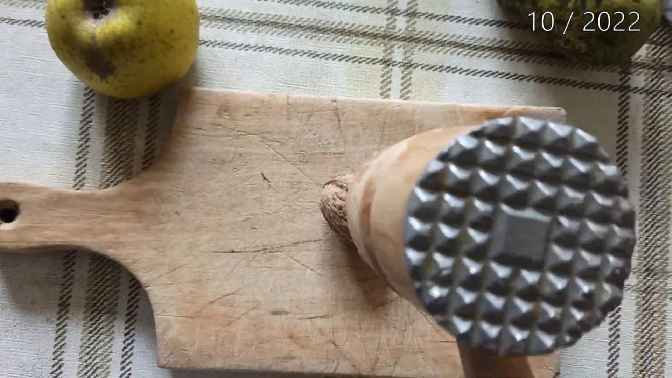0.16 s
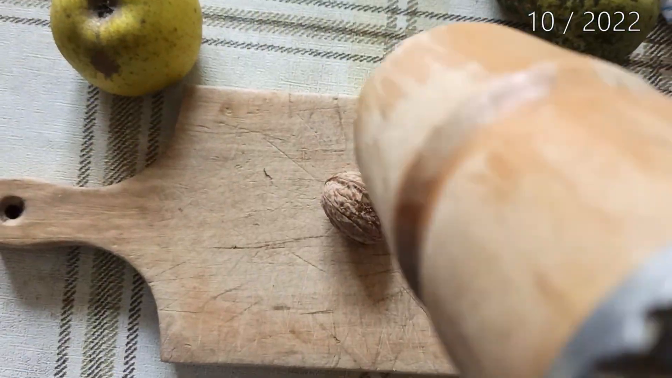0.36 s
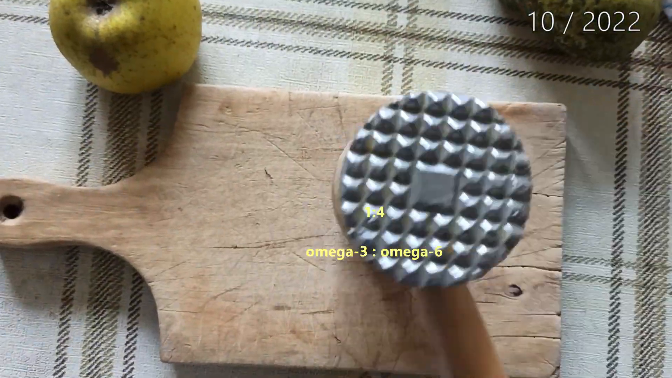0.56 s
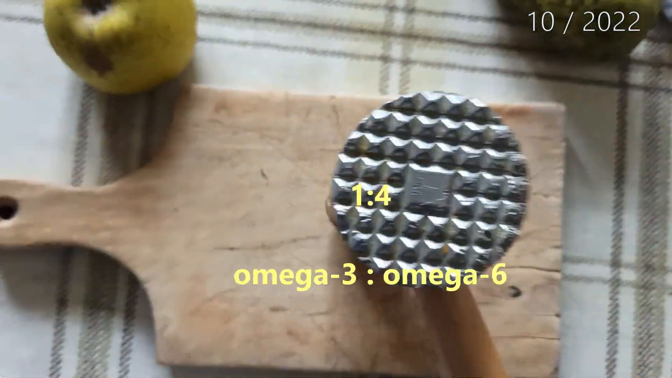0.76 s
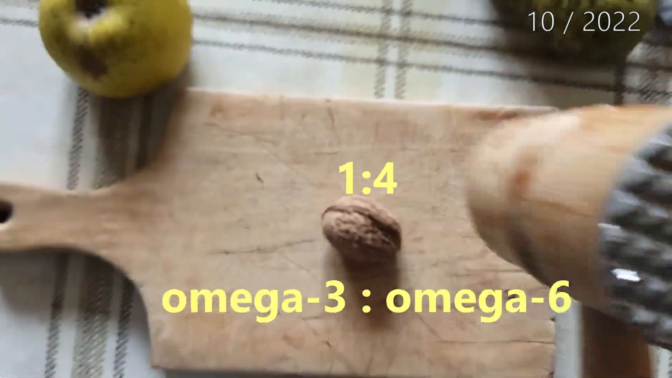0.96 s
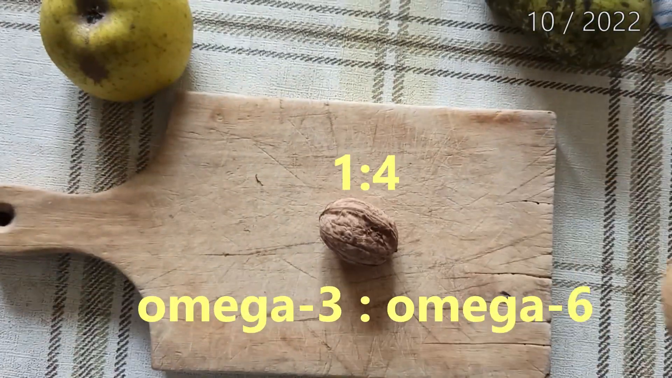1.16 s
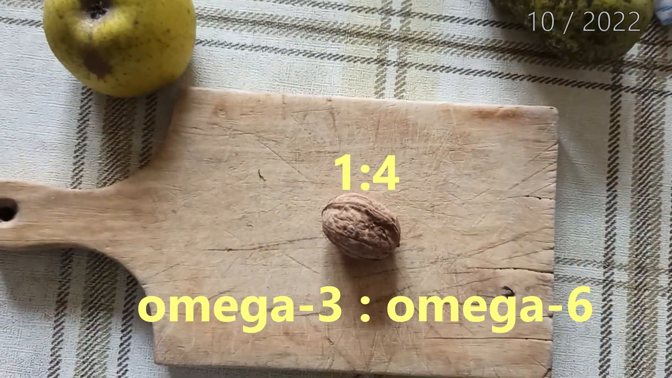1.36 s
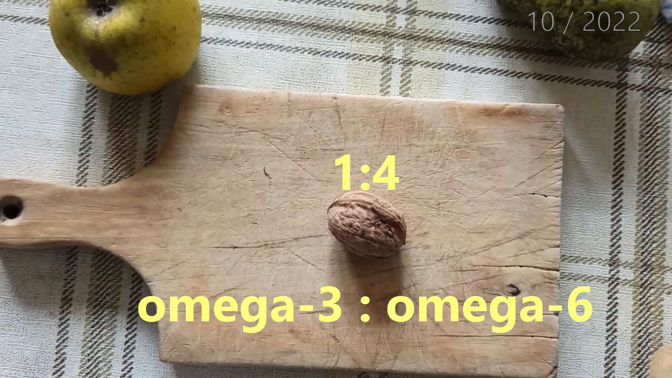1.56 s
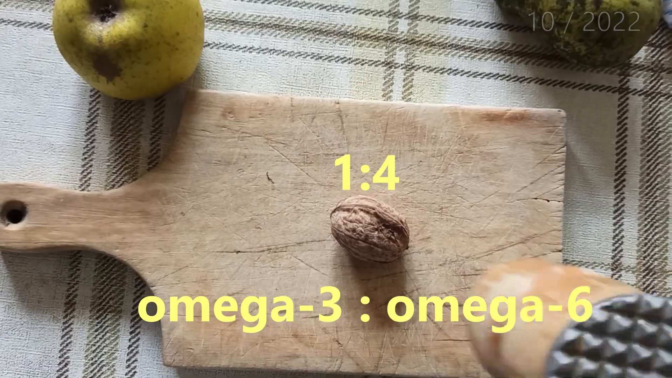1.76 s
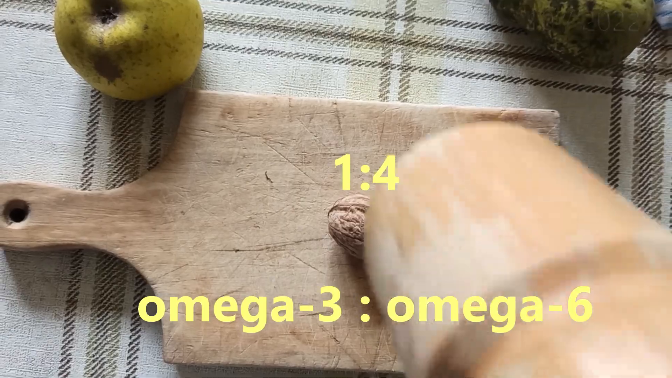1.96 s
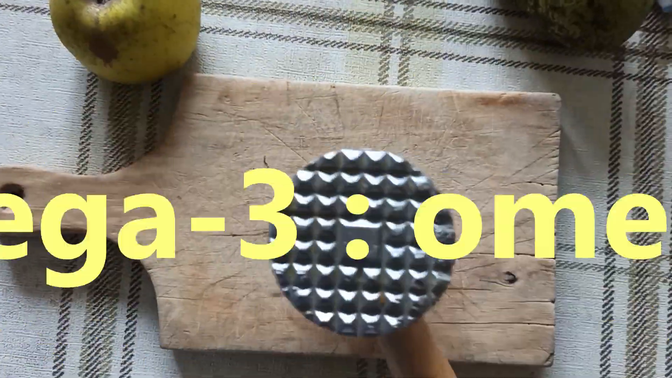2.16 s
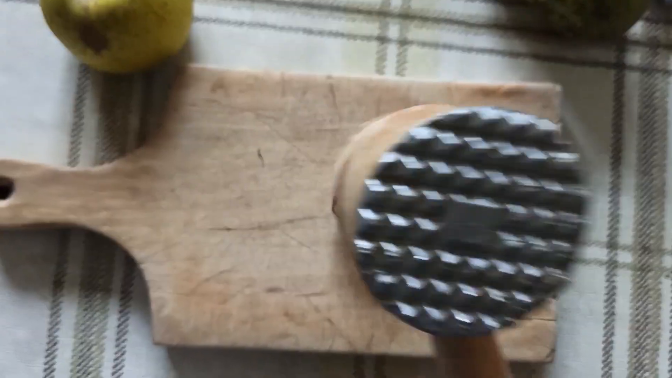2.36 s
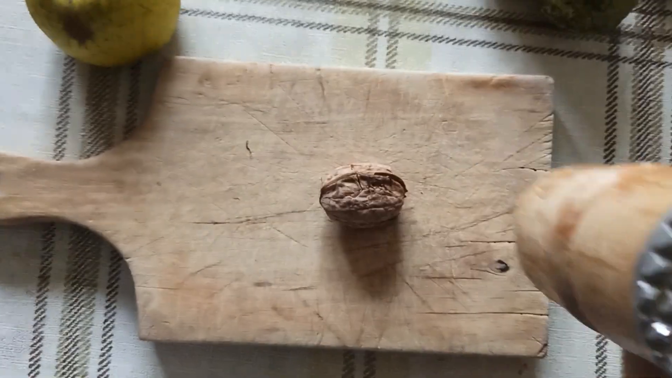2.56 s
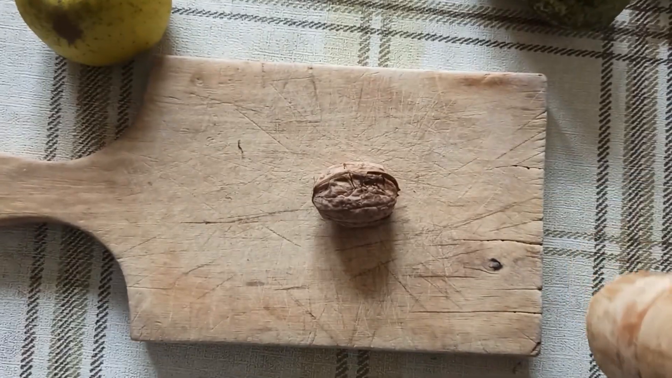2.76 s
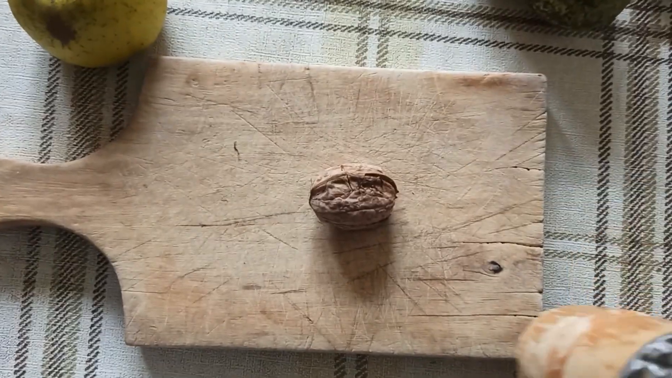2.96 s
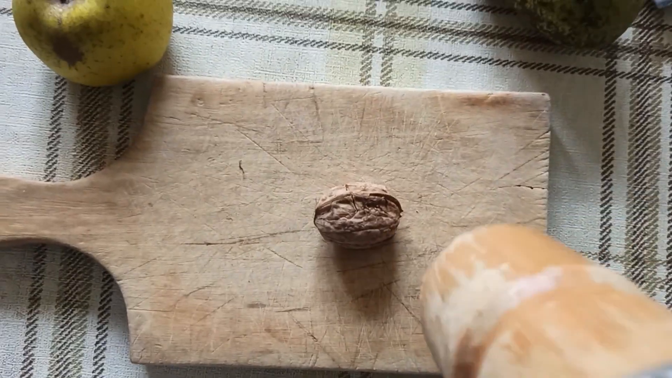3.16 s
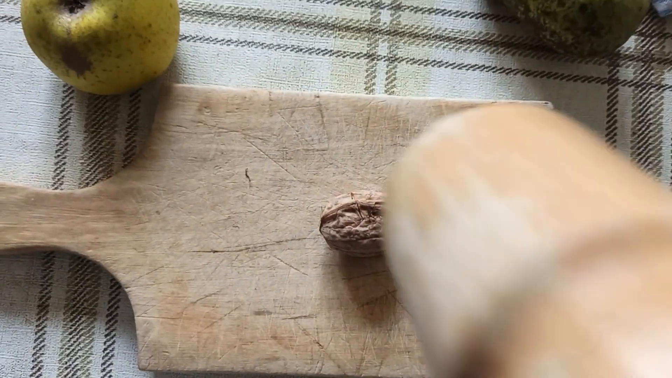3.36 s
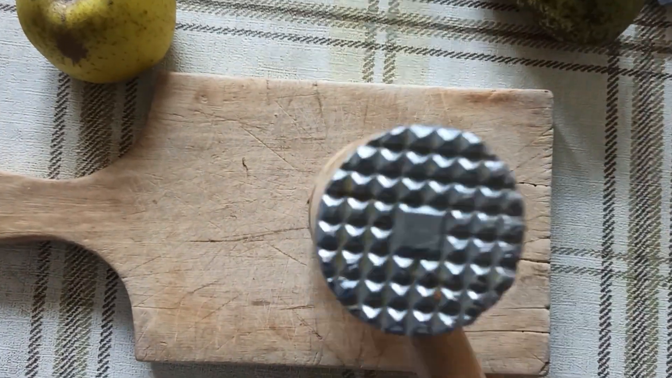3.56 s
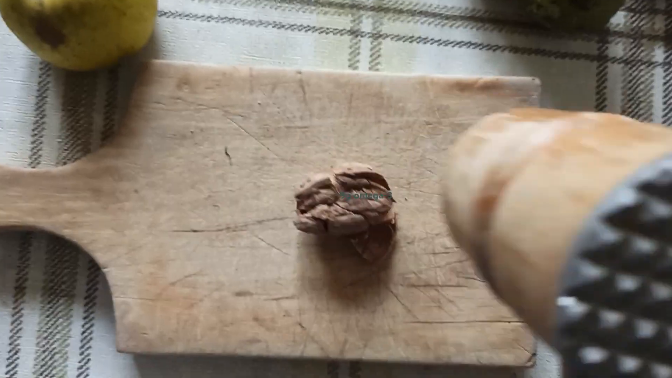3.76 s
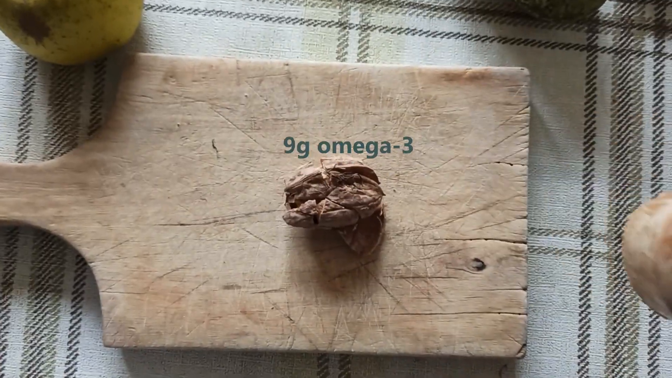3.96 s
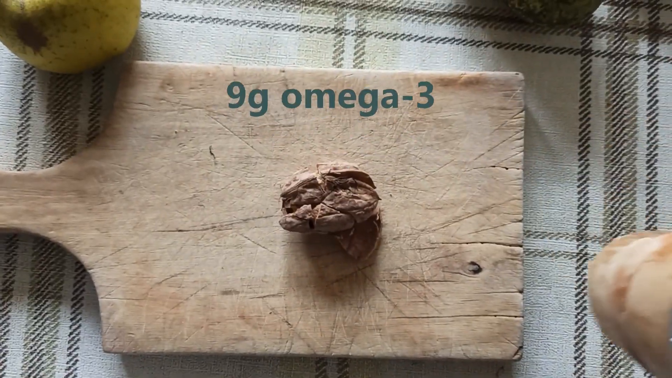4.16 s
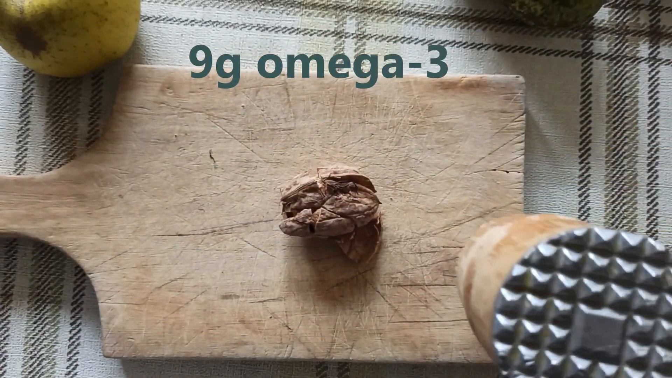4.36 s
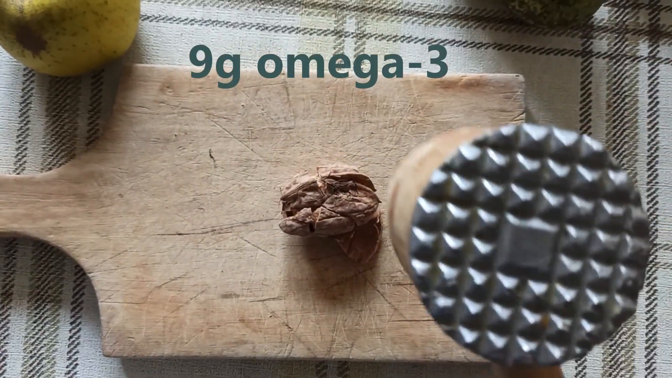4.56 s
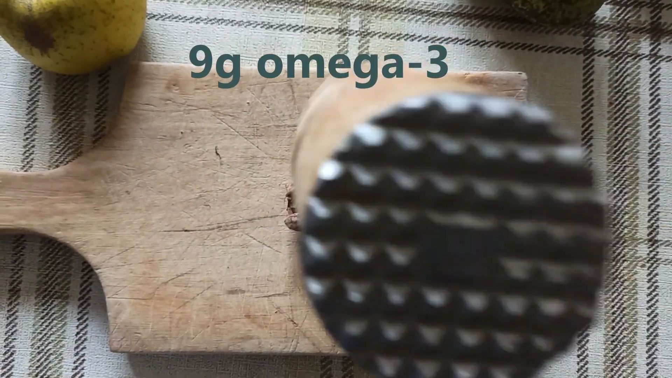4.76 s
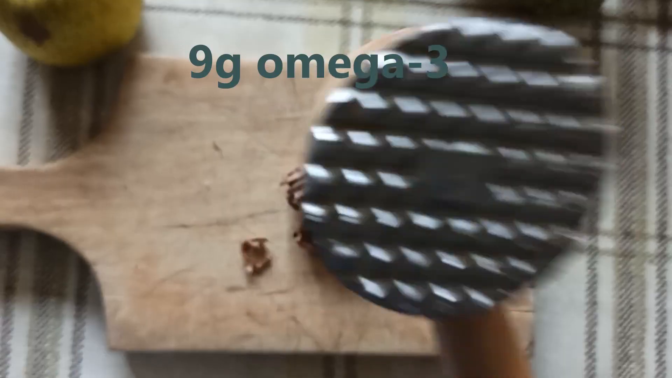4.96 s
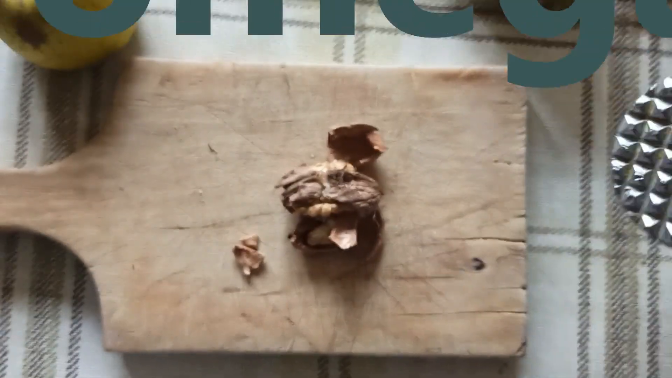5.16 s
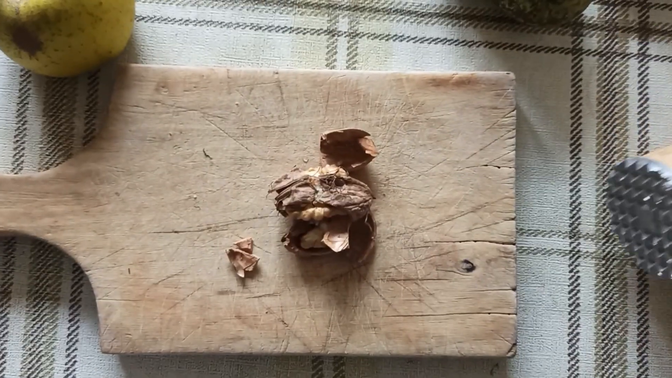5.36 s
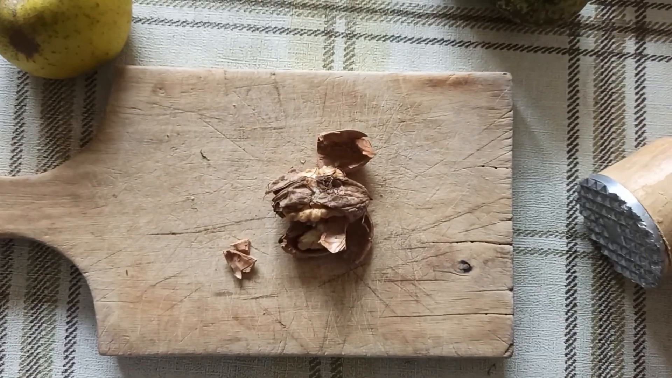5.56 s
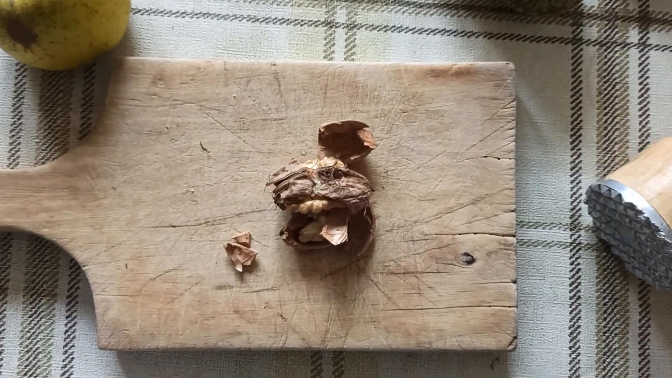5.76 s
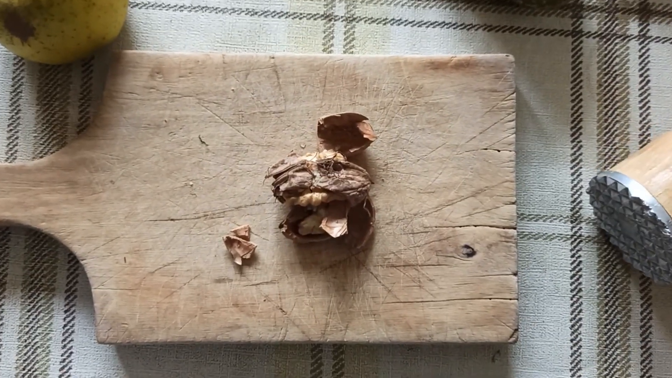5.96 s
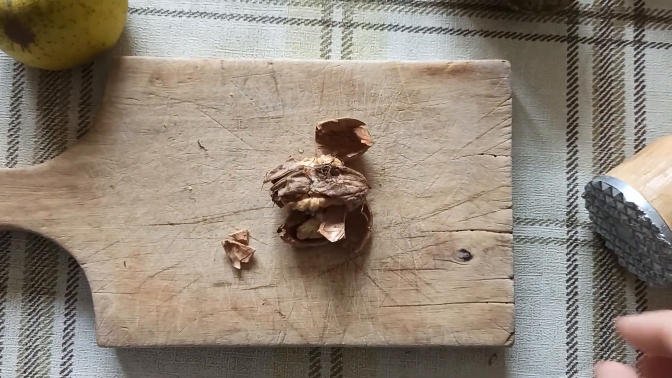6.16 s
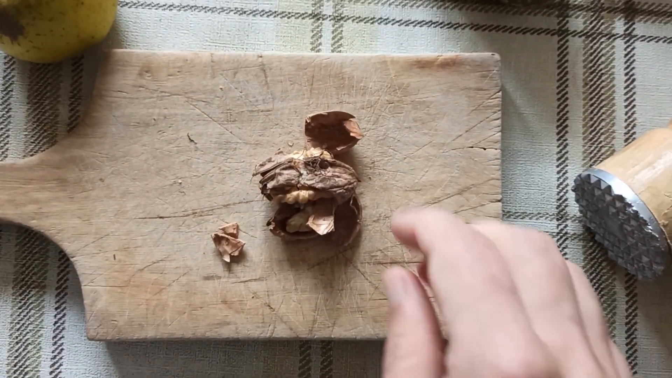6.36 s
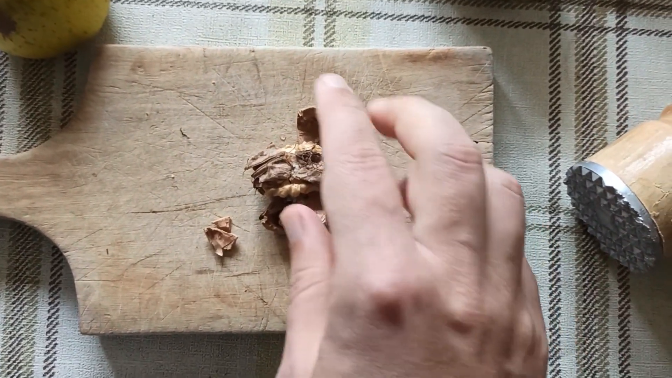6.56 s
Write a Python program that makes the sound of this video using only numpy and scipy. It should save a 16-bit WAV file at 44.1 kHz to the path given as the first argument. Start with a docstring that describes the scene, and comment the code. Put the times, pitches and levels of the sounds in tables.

```python
"""In a small, lively kitchen a fridge hums throughout and something ticks faintly once a second.
From 0.6 s a wooden mallet cracks a walnut on a cutting board with four hard blows: each fractures
the shell and excites the modes of board and room, and the close microphone's limiter ducks under it.
At 5.4 s the mallet is laid on the table: its metal face rings in free vibration,
then its wooden parts bump down and loose bits of shell hop."""
import sys
import numpy as np
from scipy import signal
from scipy.fft import rfft, irfft, next_fast_len
from scipy.io import wavfile
from scipy.ndimage import uniform_filter1d, map_coordinates

SR = 44100
rng = np.random.default_rng(int(sys.argv[2]) if len(sys.argv) > 2 else 0)


def dump(signal):
    """Clip the signal to [-1, 1] and save it as 16-bit WAV at the path in sys.argv[1]."""
    limited = np.clip(np.atleast_2d(signal).T, -1, 1)
    pcm = np.round(limited * 32767).astype(np.int16)
    wavfile.write(sys.argv[1], SR, pcm)


N = 291501
TIME = np.arange(N) / SR
AGE = np.arange(SR) / SR  # time since a contact


def amp(db):
    """Amplitude ratio of a level in decibels."""
    return 10 ** (np.asarray(db) / 20)

def unit(x):
    """Normalisation to rms 1."""
    return x / np.sqrt(np.mean(x ** 2) + 1e-20)

def along(points, hz):
    """Interpolation of (f, value) points on a logarithmic frequency axis."""
    f, value = np.transpose(points)
    return np.interp(np.log(hz + 1), np.log(f + 1), value)

def add(track, s, sound):
    """Superposition of a sound on the track from time s."""
    start = round(s * SR)
    track[start:start + len(sound)] += sound[:N - start]

def filtered(x, response):
    """Multiplication of the spectrum by a complex frequency response."""
    size = next_fast_len(len(x) + SR // 4)
    return irfft(rfft(x, size) * response(np.fft.rfftfreq(size, 1 / SR)), size)[:len(x)]

def cut(x, hz, kind, order=2):
    """Causal low-pass or high-pass filter."""
    return signal.sosfilt(signal.butter(order, min(hz, .45 * SR), kind, fs=SR, output="sos"), x)

def coloured(x, points, size=2048):
    """Minimum-phase filter through (f/Hz, gain/dB) points, by folding the cepstrum."""
    gain = amp(along(points, np.fft.rfftfreq(size, 1 / SR)))
    cepstrum = irfft(np.log(gain))
    cepstrum[1:size // 2] *= 2
    cepstrum[size // 2 + 1:] = 0
    return signal.fftconvolve(x, irfft(np.exp(rfft(cepstrum))))[:len(x)]

def wobble(rate):
    """Smooth random modulation with rate knots a second."""
    return map_coordinates(rng.standard_normal(int(N * rate / SR) + 4), [TIME * rate])

def fade(t, t60):
    """Exponential decay of 60 dB in t60 seconds."""
    return np.exp(-np.log(1000) * t / t60)

def ring(modes, scatter_db, polarity=-1):
    """Modal superposition: damped sines at scattered levels; polarity -1 alternates their signs."""
    sound = np.zeros(SR)
    for k, (hz, db, t60) in enumerate(modes):
        strength = polarity ** k * amp(db + scatter_db * rng.standard_normal())
        sound += strength * fade(AGE, t60) * np.sin(2 * np.pi * hz * AGE)
    return sound


# noise spectrum of fridge and room air: f/Hz, relative level/dB
AIR_SPECTRUM = [(35, -23.5), (85, -3.5), (210, 0.5), (400, -4.5), (1150, -12), (1450, -8), (1900, -10.5),
                (2300, -18), (3100, -22.5), (4200, -14.5), (5300, -20), (7400, -20), (11000, -34.5),
                (12100, -28), (12700, -19), (13500, -29.5), (15700, -26)]
# the fridge's thin whines: f/Hz, rms level/dB
FRIDGE_WHINES = [(1367, -70.5), (1440, -71), (1542, -73.5), (2681, -79), (2729, -85.5), (3530, -80),
                 (4221, -79), (12629, -82)]

def fridge(air_db=-56.5, mains_hz=99.0, mains_db=-61, waver_db=1.0, drift_rad=1.04):
    """Broadband air noise, mains hum and whines under random amplitude and phase modulation."""
    air = unit(coloured(rng.standard_normal(N), AIR_SPECTRUM, size=8192))
    air *= amp(air_db + 1.34 * wobble(0.51))
    mains = amp(mains_db + 0.32 * wobble(2.7)) * unit(np.sin(2 * np.pi * mains_hz * TIME))
    whines = np.zeros(N)
    for hz, db in FRIDGE_WHINES:
        strength = amp(db + waver_db * wobble(3.72))
        whines += strength * unit(np.sin(2 * np.pi * hz * TIME + drift_rad * wobble(22)))
    return air + mains + whines

def ticking(first_s=0.283, width_s=0.035, db=-60):
    """Modulated noise: a far tick each second, perhaps a clock, smeared into a swish by the room."""
    from_tick = (TIME - first_s + .5) % 1 - .5
    tick_tock = amp(-2.8 * np.cos(np.pi * (TIME - first_s)))  # every other tick is stronger
    spectrum = [(1500, -25), (3500, 1), (6000, 8), (8000, -0.5), (12000, -18)]
    hiss = unit(coloured(rng.standard_normal(N), spectrum))
    return amp(db) * tick_tock * np.exp(-np.abs(from_tick) / width_s) * hiss


# the kitchen's diffuse field: f/Hz, relative level/dB
DIFFUSE_SPECTRUM = [(60, -25), (170, 1.5), (300, 17.5), (700, 8), (1250, -2.5), (2600, -6), (7000, -3),
                    (13500, -9.5)]
# its reverberation time: f/Hz, T60/s
REVERB_TIMES = [(100, 0.6), (500, 0.42), (2000, 0.49), (4500, 0.4), (7500, .36), (14000, 0.29)]

def kitchen(sound, build_up_s=0.0057):
    """Reverberation: diffuse reflections build up, then decay, the treble fastest."""
    hz, t, noise = signal.stft(rng.standard_normal(SR), SR, nperseg=256)
    t60 = along(REVERB_TIMES, hz)[:, None]
    gain = amp(along(DIFFUSE_SPECTRUM, hz))[:, None] * np.sqrt(2 * np.log(1000) / (t60 * SR))
    tail = signal.istft(noise * gain * fade(t, t60), SR, nperseg=256)[1][:SR]
    onset = 1 - np.exp(-(AGE / build_up_s) ** 2)
    return signal.fftconvolve(sound, cut(tail, 137.0, "high", order=3) * onset)[:SR]


# low standing waves of the kitchen: f/Hz, level/dB, T60/s
ROOM_MODES = [(121.8, -15.5, 0.56), (135, -31, 0.85), (169.8, -26.5, 0.55), (208.1, -25, 0.36),
              (222.6, -20, 0.51), (250.7, -26, 0.42), (294, -26.5, 0.31), (341, -71, 0.14)]

def boom(swell_s=0.0011):
    """Room resonance: the table top excites the standing waves, all in phase."""
    return ring(ROOM_MODES, scatter_db=.5, polarity=1) * (1 - np.exp(-AGE / swell_s))

def push(length_s=0.0012, db=-23):
    """Air displacement: one low pressure swing as the board is driven down."""
    return amp(db) * (1 - AGE / length_s) * np.exp(-AGE / length_s)


# modes of the board on its table: f/Hz, level/dB, T60/s
BOARD_MODES = [(79.2, -45.5, 0.74), (140, -2.5, 0.011), (242.8, -13, 0.059), (367, -22, 0.039),
               (426.6, -22, 0.063), (586.4, -17.5, 0.038), (683, -16, 0.049), (875, -8, 0.0088)]

def thump(top_hz, room_db=0):
    """Impact excitation of board and room; the contact acts as a low-pass, duller when softer."""
    knock = ring(BOARD_MODES, scatter_db=1.0)
    return cut(knock + amp(room_db) * kitchen(knock), top_hz, "low", order=3)


# mallet bumping on board and cloth: t/s, level/dB, low cutoff/Hz, high cutoff/Hz, reverberation/dB
MALLET_BUMPS = [(0.651, -8, 163, 1400, -26), (3.159, -33, 273, 414, -4.5), (4.419, -33, 377, 2200, -15),
                (5.3611, -8, 123, 1100, -11), (5.439, -4.5, 146, 756, -4), (5.511, -9.5, 104, 325, -4.5),
                (5.937, -12, 197, 527, -7.5)]

def bumps(boom_db=-2):
    """Soft impacts: the mallet excites board and standing waves over a limited band."""
    track = np.zeros(N)
    for s, db, low_hz, top_hz, room_db in MALLET_BUMPS:
        contact = thump(top_hz, room_db) + amp(boom_db) * boom()
        add(track, s, amp(db) * cut(contact, low_hz, "high", order=5))
    return track


# modes of the mallet's metal face: f/Hz, relative level/dB, T60/s
METAL_MODES = [(915, 2, 0.015), (1023, -1, 0.31), (1060, -14, 0.083), (1737, -21, 0.086), (2003, -25, 0.17),
               (2516, -21, 0.3), (2542, -19, 0.39), (4360, -25, 0.029), (6342, -17.5, 0.085),
               (8450, -35, 0.15)]

def clank(at_s=5.362, ring_db=-17.5, click_db=-34, room_db=-2, free_s=0.089):
    """Free vibration: the metal face clicks on the table and rings until the cloth damps it."""
    track = np.zeros(N)
    damping = fade(np.maximum(AGE - free_s, 0), t60=0.2)  # sets in once the head lies flat
    metal = amp(ring_db) * ring(METAL_MODES, scatter_db=2.5) * damping
    scrape = rng.standard_normal(SR) * fade(AGE, t60=0.072)
    click = amp(click_db) * cut(cut(scrape, 1200, "high"), 3500, "low", order=1)
    echo = kitchen(cut(metal, 2000, "high") + click)  # only the high ring and the click echo
    add(track, at_s, metal + click + amp(room_db) * echo)
    return track


# resonances of the walnut shell: f/Hz, bandwidth/Hz, level/dB
SHELL_RESONANCES = [(1236, 530, -4), (1635, 526, 5.5), (2490, 850, 1.5), (4530, 3930, -5),
                    (7600, 980, -1.5), (14200, 2900, -11.5)]

def shell_ring(bite_db, bright_db):
    """Impulse response of the shell to one tiny fracture; bite and brightness set its edge."""
    def resonances(f):
        return sum((-1) ** k * amp(db) * 1j * f * width / (hz * hz - f * f + 1j * f * width)
                   for k, (hz, width, db) in enumerate(SHELL_RESONANCES))
    shell = filtered(signal.unit_impulse(SR), resonances)
    return coloured(shell, [(300, -31), (1000, 9.5), (1600, -1.5), (2700, bite_db), (7000, bright_db)])

def crack(length_s, bite_db, bright_db, count=40):
    """Brittle fracture: a quick run of random impulses excites the shell."""
    shell = shell_ring(bite_db, bright_db)
    onsets = (rng.random(count) * length_s * SR).astype(int)
    fractures = np.bincount(onsets, rng.standard_normal(count))
    snap = signal.fftconvolve(shell, fractures / np.linalg.norm(fractures))[:SR]
    # the room gathers the shell's sound from all directions, so its response is smooth
    return snap + kitchen(shell)

def splinters(after_s, bite_db, bright_db, mean_delay_s=0.0054, count=6):
    """Delayed fracture: the last fibres snap one by one after the main crack."""
    delays = np.minimum(after_s + rng.exponential(mean_delay_s, count), .5)
    snaps = np.bincount((delays * SR).astype(int), rng.standard_normal(count))
    return signal.fftconvolve(shell_ring(bite_db, bright_db), snaps / np.linalg.norm(snaps))[:SR]

def hollow(hz=1320, t60=0.016, rise_s=0.00062, db=-24):
    """Damped resonance: the nut's hollow body gives a very short pock."""
    return amp(db) * np.sin(2 * np.pi * hz * AGE) * fade(AGE, t60) * (1 - np.exp(-AGE / rise_s))


# single light ticks and scrapes of loose shell: t/s, level/dB
SHELL_TICKS = [(0.92, -18), (4.407, -22), (5.202, -15), (5.2234, -15), (5.926, -10.5)]

def crumbs(hop_db=-4, landing_db=-2, flight_s=.043):
    """Light impacts: loose bits of shell give single high ticks, and hop and land after each bump."""
    track = np.zeros(N)
    hops = [(s, db + hop_db) for s, db, *_ in MALLET_BUMPS]
    landings = [(s + flight_s, db + landing_db) for s, db in hops]
    for s, db in SHELL_TICKS + hops + landings:
        add(track, s, amp(db) * crack(length_s=0.0021, bite_db=-6, bright_db=-6))
    return cut(cut(track, 9000, "low"), 4500, "high", order=1)


# mallet on walnut, row two being a rebound: t/s, force/dB, crack level/dB, bite/dB, brightness/dB
MALLET_BLOWS = [(0.592, 4.5, 26.5, -5, -5.5), (0.6411, -17, 14, 3, -7.5), (2.1794, 6, 27.5, -2.5, 0.8),
                (3.5296, 1.8, 23, 1, 3.9), (4.9053, -4.5, 21, -6.5, 2.3)]

def blows(fracture_s=.004, thump_top_hz=814, splinter_db=-11, boom_db=1.5):
    """Hard impacts: more force splits the shell for longer and makes the thump louder and brighter."""
    track = np.zeros(N)
    for s, force_db, crack_db, bite_db, bright_db in MALLET_BLOWS:
        force = amp(force_db)
        nut = crack(fracture_s * force ** .08, bite_db, bright_db, count=70) + hollow()
        nut += amp(splinter_db) * splinters(fracture_s, bite_db, bright_db)
        wood = thump(thump_top_hz * force ** .48) + amp(boom_db) * (boom() + push())
        add(track, s, amp(crack_db) * nut + force * wood)
    return track

def scene():
    """Superposition of all sources in one channel."""
    return (blows() + bumps() + clank() + crumbs() + ticking() + fridge())[None]


def limiter(x, ceiling_db=-14, release_db_per_s=48):
    """Gain control: the gain drops at once under a loud burst and recovers at a steady rate."""
    power = np.abs(uniform_filter1d(x ** 2, size=176)) + 1e-12
    excess_db = np.maximum(10 * np.log10(power) - ceiling_db, 0)
    recovery_db = release_db_per_s * TIME
    duck_db = np.maximum.accumulate(excess_db + recovery_db) - recovery_db
    return x * amp(-uniform_filter1d(duck_db, size=88, origin=-43))


# response of the microphone port with its deep treble notch: f/Hz, gain/dB
MIC_RESPONSE = [(4650, -1.5), (4950, -9), (6000, -6), (6400, 0), (8250, 0), (8900, -11.5), (10000, -9.5),
                (11200, -14.5), (11750, 2.5), (14500, 0.5), (16000, -5)]

def record(dry, clip_level=.62, top_hz=15900):
    """Transduction: microphone response, limiter, soft saturation and band limit."""
    x = limiter(coloured(dry[0], MIC_RESPONSE))
    x = x / (1 + (x / clip_level) ** 6) ** (1 / 6)
    return filtered(x, lambda hz: 1 / (1 + (hz / top_hz) ** 120))[None]


dry = scene()
out = record(dry)
dump(out)
```